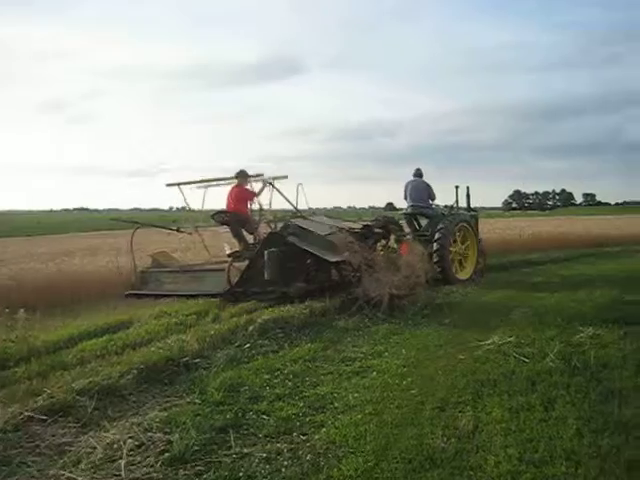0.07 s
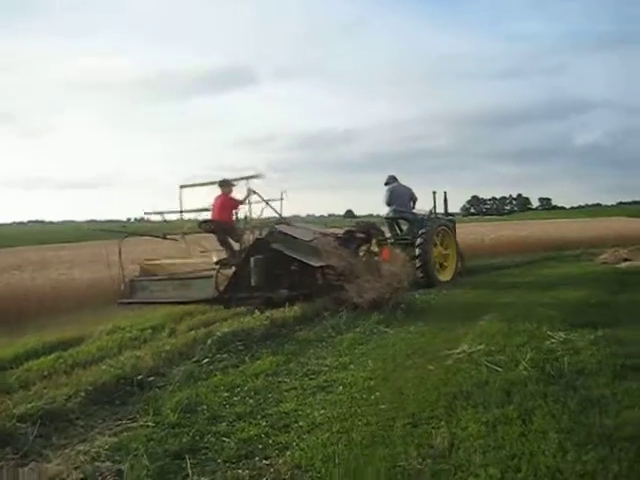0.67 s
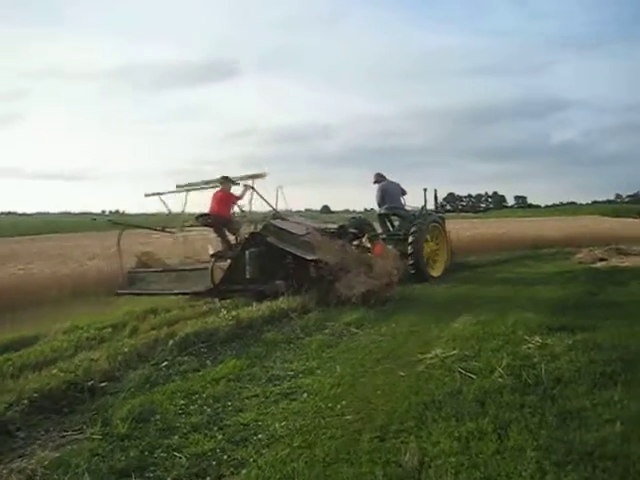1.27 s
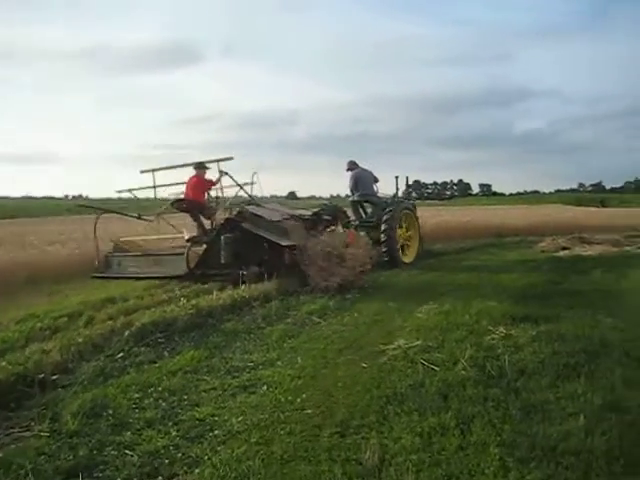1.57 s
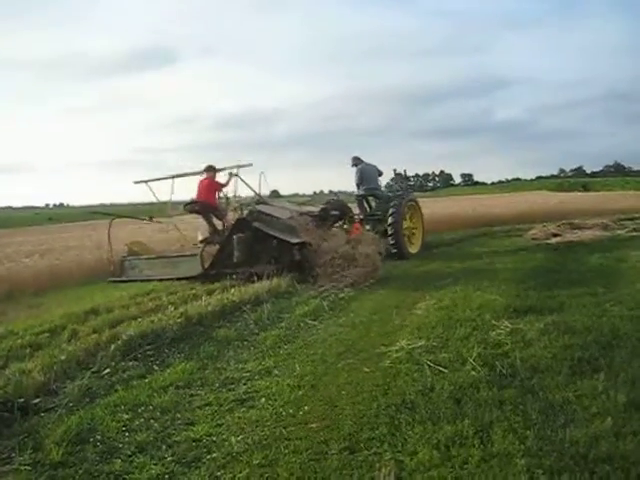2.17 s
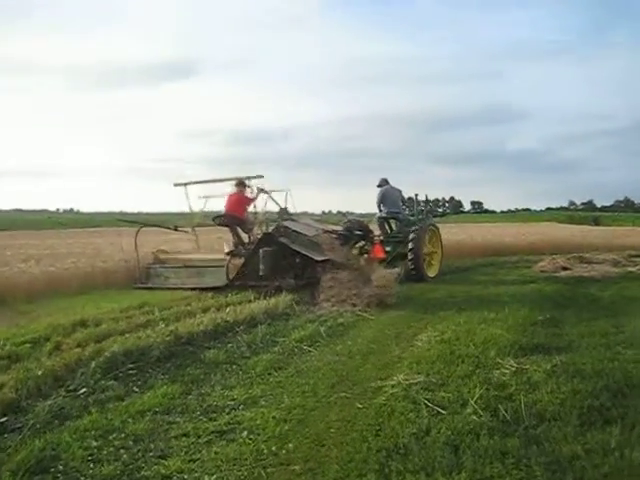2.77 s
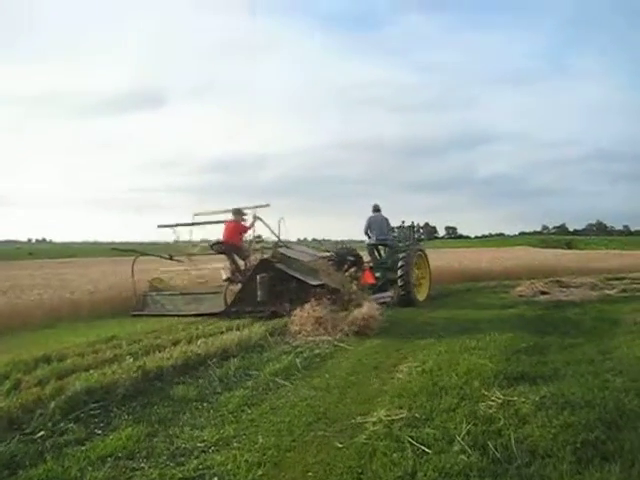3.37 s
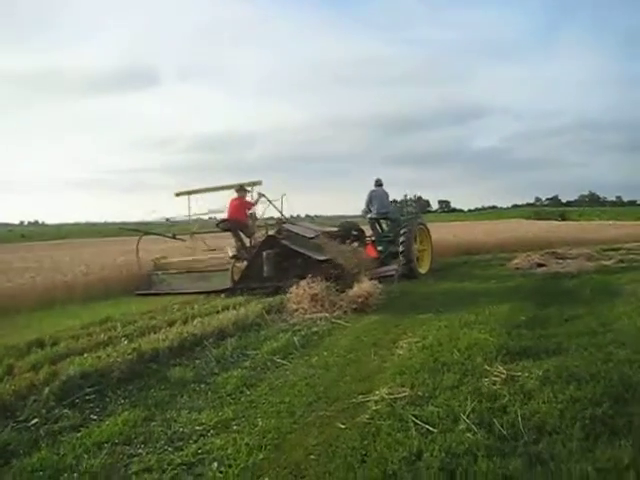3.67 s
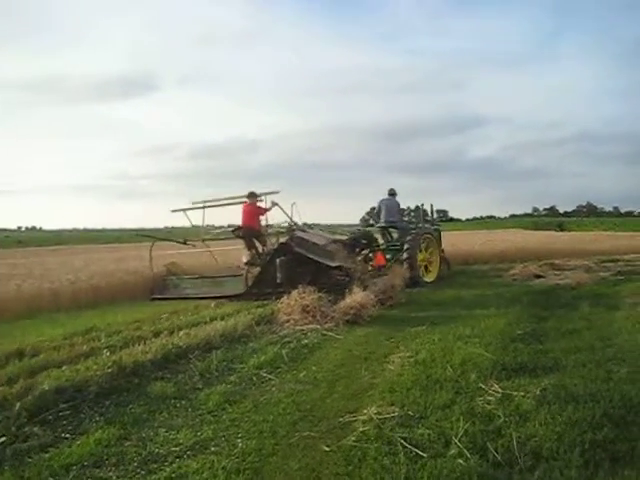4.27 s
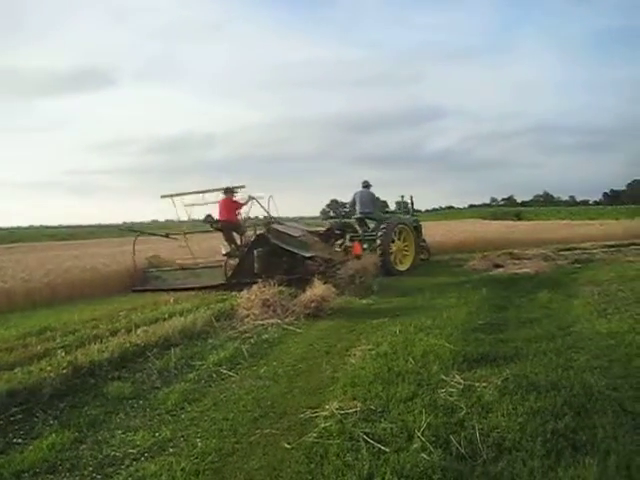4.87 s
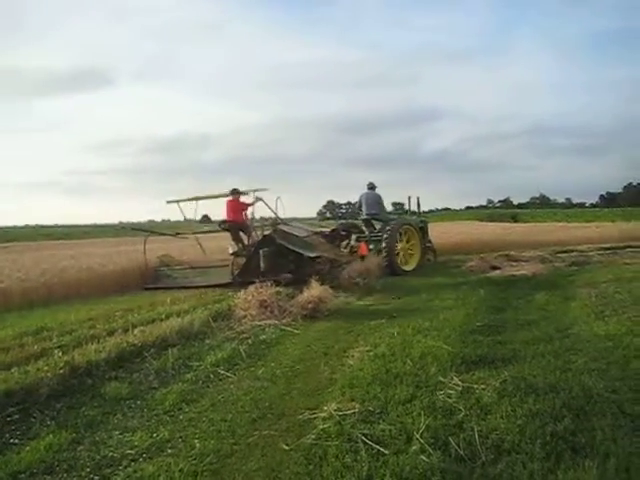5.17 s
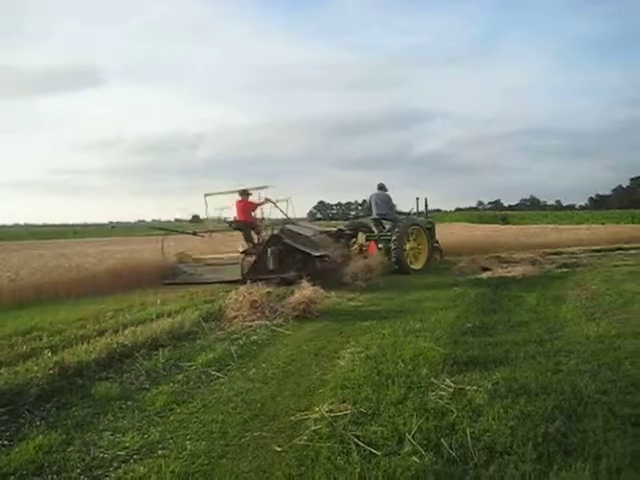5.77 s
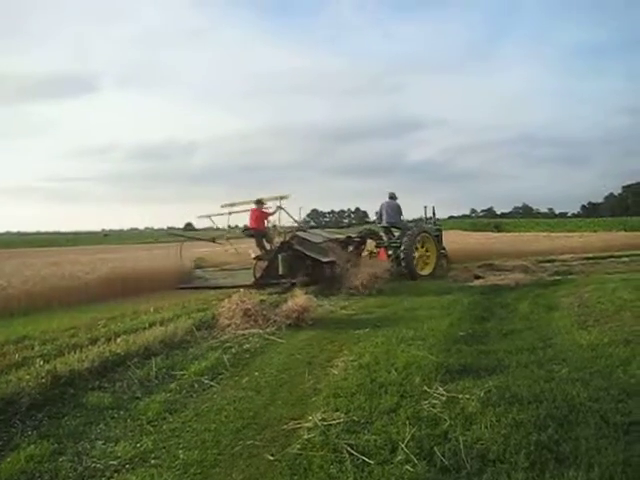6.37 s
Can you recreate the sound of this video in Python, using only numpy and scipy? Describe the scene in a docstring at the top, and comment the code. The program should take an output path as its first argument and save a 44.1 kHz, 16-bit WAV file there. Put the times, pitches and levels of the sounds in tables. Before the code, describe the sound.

Fast chain clatter, sickle knocks and rustling straw from a towed harvesting machine, over an old tractor's soft chug.

```python
"""A bright, fast rattle and a dry rustle: a grain binder in a wheat field, some metres away in the open.
Its drive chain clatters over a twelve-tooth sprocket, the sickle knocks at both ends of its stroke,
loose iron clanks and straw goes through in wads. Underneath chugs the quieter two-cylinder tractor
that pulls it, two uneven exhaust puffs a cycle. Towards the end the binder lurches with each crank turn."""
import sys
import numpy as np
from scipy import signal
from scipy.fft import rfft, irfft, next_fast_len
from scipy.io import wavfile

SR = 44100
rng = np.random.default_rng(int(sys.argv[2]) if len(sys.argv) > 2 else 0)


def generate_wav(sig):
    """Save sig (samples, or channels by samples) to the path in sys.argv[1] as 16-bit PCM at SR."""
    pcm = np.round(np.clip(np.atleast_2d(sig).T, -1, 1) * 32767).astype(np.int16)
    wavfile.write(sys.argv[1], SR, pcm)


N = 283122
T = np.arange(N) / SR


def from_db(db):
    """Decibels to gain."""
    return 10 ** (np.asarray(db) / 20)


def unit_rms(x):
    """Scale to unit power."""
    return x / np.sqrt(np.mean(x ** 2) + 1e-20)


def automation(rows):
    """One curve for each column after the time, read at every sample."""
    times, *columns = np.transpose(rows)
    return [np.interp(T, times, column) for column in columns]


def scatter(count):
    """Random variation with a spread of about 1 and no wild outliers."""
    return np.clip(rng.standard_normal(count), -1.7, 1.5)


def shaft_times(speed, phase, marks=1):
    """Times at which a shaft passes evenly spaced marks, the first at `phase` of a turn."""
    turns = np.cumsum(automation(speed)[0]) / SR
    return np.interp(np.arange(phase, turns[-1], 1 / marks), turns, T)


def clicks(times, sizes):
    """One-sample hits at the given times."""
    return np.bincount(np.clip(np.round(times * SR).astype(int), 0, N - 1), sizes, N)


def decay(x, seconds):
    """Give each hit an exponential tail."""
    return signal.lfilter([1], [1, -np.exp(-1 / (seconds * SR))], x + 1e-18)


def ring(x, hz, t60):
    """Resonator: a unit hit starts a dying cosine of height 1."""
    r, w = from_db(-60 / (t60 * SR)), 2 * np.pi * hz / SR
    return signal.lfilter([1, -r * np.cos(w)], [1, -2 * r * np.cos(w), r * r], x + 1e-18)


def grains(per_s, spread_db):
    """A crackle of tiny random contacts of uneven size; rms 1."""
    sizes = rng.standard_normal(N) * from_db(spread_db * np.minimum(rng.exponential(1, N), 4))
    return unit_rms(sizes * (rng.random(N) < per_s / SR))


def body(x, eq):
    """Colour a sound with a minimum-phase body that has this EQ curve; rms 1."""
    size = 2 * next_fast_len(N // 2 + 4096)
    hz, db = np.transpose(eq)
    bin_hz = np.arange(size // 2 + 1) * SR / size
    gain = from_db(np.interp(np.log(bin_hz + 1), np.log(hz), db))
    cepstrum = irfft(np.log(gain))[:size // 2]
    # folding the cepstrum onto positive times keeps all ringing after the hit
    response = np.exp(rfft(2 * cepstrum, size))
    return unit_rms(irfft(rfft(x, size) * response)[:N])


# engine tempo: (time [s], speed [cycles/s])
ENGINE_SPEED = [(0.0, 10.187), (0.71, 10.227), (1.43, 10.179), (2.14, 10.262), (2.85, 10.18), (3.57, 10.24),
                (4.28, 10.178), (4.99, 10.197), (5.71, 10.125), (6.42, 10.239)]
# pressure pulses of one cycle, firing first, intake last: (phase [cycles], signed strength [ratio])
ENGINE_STROKES = [(.531, 1), (.768, .3), (.021, -.33)]
def engine_pulses():
    """The strokes repeat every cycle, nearly alike in strength."""
    pulses = 0
    for phase, strength in ENGINE_STROKES:
        times = shaft_times(ENGINE_SPEED, phase)
        pulses = pulses + clicks(times, strength * from_db(.5 * scatter(len(times))))
    return pulses


# slapback off the machinery as the angle changes: (time [s], level against the direct puff [dB])
EXHAUST_ECHO = [(0, -11), (1.2, -25), (1.8, -14), (2.8, -3), (3.8, -1), (4.3, -15), (6.42, -17)]
# pipe overtones: (frequency [Hz], level before muffling [dB], t60 [s])
PIPE_MODES = [(72.3, -18, 0.37), (83, -18, 0.22), (121, -13, 0.35), (154.6, -20.5, 0.75),
              (175, -24.5, 0.79), (214.5, -24, 0.36)]
# low boom of the pipe: (time [s], level [dB])
PIPE_BOOM = [(0.0, -41), (0.27, -47.7), (2.1, -48.5), (3.3, -52.5), (4.2, -55), (4.63, -50), (6.42, -58)]
def exhaust(pulses, puff_db, puff_s=0.0018, boom_hz=52.0, echo_s=0.017, skew=0.38):
    """Each stroke is one rounded puff with an echo, and the pipe rings on between the puffs."""
    u = np.arange(-600, 601) / SR / puff_s   # time in puff widths
    puff_shape = (u * u - 1 - skew * u) * np.exp(-u * u / 2)
    puffs = np.convolve(pulses, puff_shape, "same")
    echo = from_db(automation(EXHAUST_ECHO)[0]) * np.interp(T - echo_s, T, puffs)
    muffle = signal.butter(2, 600, fs=SR, output="sos")
    modes = sum(from_db(db) * ring(pulses, hz, t60) for hz, db, t60 in PIPE_MODES)
    overtones = -signal.sosfilt(muffle, modes)
    boom = -signal.sosfilt(muffle, ring(pulses, boom_hz, t60=0.99))
    boom_db = automation(PIPE_BOOM)[0]
    return from_db(puff_db) * unit_rms(puffs + echo + overtones) + from_db(boom_db) * unit_rms(boom)


# midrange bite of the exhaust: (frequency [Hz], gain [dB])
RASP_EQ = [(300, -24), (1100, 1), (3500, 1.5), (9000, -18.5)]
def exhaust_rasp(pulses, decay_s=0.02):
    """Gas rasps out of the stack after each outward stroke."""
    return body(decay(np.maximum(pulses, 0), decay_s) * rng.standard_normal(N), RASP_EQ)


# dark roar of the block: (frequency [Hz], gain [dB])
BLOCK_EQ = [(25, -42), (60, -11), (110, -5.5), (180, -2), (285, -5), (325, -1), (360, -2.5), (490, -1),
            (512, 5.5), (560, 1), (675, -0.5), (715, -14.5), (900, 0), (2000, -11), (8000, -34)]
def engine_block(pulses, surge=0.11):
    """Gears and valves roar in the iron block, swelling at each firing."""
    return body(rng.standard_normal(N) * (1 + surge * decay(pulses, seconds=0.018)), BLOCK_EQ)


# tractor faders: (time [s], puff level [dB], block level [dB])
TRACTOR_LEVELS = [(0.0, -43.5, -39.5), (1.25, -46, -39.5), (1.6, -47, -43), (1.85, -43.5, -39.5),
                  (3.3, -43.5, -39), (3.7, -46, -39), (4.15, -42, -37), (4.6, -45.6, -38.5),
                  (5.4, -45.5, -39), (6.42, -43, -40)]
def tractor(rasp_over_puffs_db=6.5):
    """The background chug: the same pulses drive puffs, rasp and block."""
    puff_db, block_db = automation(TRACTOR_LEVELS)
    pulses = engine_pulses()
    rasp = from_db(puff_db + rasp_over_puffs_db) * exhaust_rasp(pulses)
    return exhaust(pulses, puff_db) + rasp + from_db(block_db) * engine_block(pulses)


# light accents from small iron parts: (time [s], level [dB], pitch [Hz])
CLINK_CUES = [(.328, -20, 4600), (0.534, -21, 1350), (0.941, -21, 2960), (1.856, -24, 3229),
              (2.626, -19, 3610), (3.222, -20, 1940), (3.297, -24, 1990), (3.39, -22, 2010),
              (3.684, -21, 4694), (3.985, -21, 1205), (4.375, -20, 1520), (5.14, -22, 1980),
              (5.238, -25, 2800), (5.752, -21, 2660), (5.852, -21, 2750), (6.166, -24, 1660)]
def clinks(ring_t60=0.047):
    """A single tap sets a small part ringing at one pitch."""
    return sum(ring(clicks(np.array([s]), [from_db(db)]), hz, ring_t60) for s, db, hz in CLINK_CUES)


def frame_rattle(per_s=5, ring_t60=0.057, spread_db=2.5, parts=48):
    """Rods, guards and sheet panels are jolted at random, each ringing at its own pitch."""
    rattle = 0
    for hz in np.geomspace(1000, 4900, parts) * from_db(0.11 * rng.standard_normal(parts)):
        times = np.cumsum(rng.exponential(1 / per_s, size=120))
        force = from_db(spread_db * scatter(len(times))) * (times < T[-1])
        rattle = rattle + ring(clicks(times, force), hz, ring_t60) * np.sqrt(hz)
    return unit_rms(signal.sosfilt(signal.butter(2, 800, "high", fs=SR, output="sos"), rattle))


# binder crank, the tempo of lurch, sickle and chain: (time [s], speed [turns/s])
CRANK_SPEED = [(0.0, 9.765), (0.71, 9.754), (1.43, 9.797), (2.14, 9.769), (2.85, 9.807), (3.57, 9.739),
               (4.28, 9.79), (4.99, 9.709), (5.71, 9.716), (6.42, 9.817)]
# tremolo depth of the lurch: (time [s], swing [dB])
LURCH_DEPTH = [(0.0, 0), (1.2, 0), (2.0, -0.05), (5.55, 0), (5.78, 1.5), (5.95, 1.5), (6.15, 0.5),
               (6.42, 1)]
def lurch(peak_phase=0.13):
    """The binder lurches once per crank turn: a level swing in dB."""
    turns = np.cumsum(automation(CRANK_SPEED)[0]) / SR
    return automation(LURCH_DEPTH)[0] * np.cos(2 * np.pi * (turns - peak_phase))


# the two knocks of a crank turn: (phase [turns], relative level [dB], decay [s])
SICKLE_KNOCKS = [(0.188, 4, 0.008), (0.707, 1.5, 0.016)]
# iron-on-iron tone of the sickle, shared by the clanks: (frequency [Hz], gain [dB])
IRON_EQ = [(300, -14.5), (750, -12), (1150, -3), (1600, -6.5), (1930, 3.5), (2150, -5.5), (2900, -0.5),
           (3700, 0.5), (5000, -4), (7000, -5.5), (12000, -10), (15700, -23)]
def sickle(jitter_s=0.0012, spread_db=2.0):
    """The knife bar knocks at each reversal and its sections rattle in the guards."""
    envelope = 0
    for phase, db, decay_s in SICKLE_KNOCKS:
        times = shaft_times(CRANK_SPEED, phase)
        force = from_db(db + spread_db * scatter(100)[:len(times)])
        times = times + jitter_s * scatter(100)[:len(times)]
        envelope = envelope + decay(clicks(times, force), decay_s)
    envelope = decay(envelope, seconds=0.00092)   # softens the attack
    return body(envelope * grains(per_s=10000, spread_db=1.5), IRON_EQ)


# loose iron, mostly thrown as the knife reverses: (time [s], nominal peak level [dB], pitch [Hz])
CLANK_CUES = [(0.0747, -14, 3540), (0.1226, -15, 3440), (0.6325, -15.5, 2800), (0.7372, -13.5, 3740),
              (0.8385, -17, 3070), (1.0453, -11.5, 3180), (1.862, -13, 3250), (2.4696, -18, 4200),
              (2.8826, -15, 3650), (3.403, -13.5, 3800), (4.1121, -15, 3800), (4.6794, -16, 3310),
              (4.932, -17, 3590), (5.244, -15, 3810), (5.3414, -19, 4220), (5.4455, -15, 3850),
              (5.7309, -17, 3800), (6.0648, -11.5, 3610), (6.268, -15, 3170), (6.326, -20, 3640)]
def clanks(chatter_s=0.0036, ring_t60=0.017, ring_db=-4.0, crest_db=7):
    """A loose part chatters for an instant and rings briefly at its own pitch."""
    track, age = np.zeros(N + SR), T[:SR // 10]
    contact = body(rng.standard_normal(N), IRON_EQ)
    for s, db, hz in CLANK_CUES:
        start = round(s * SR)
        span = slice(start, start + len(age))
        hit = np.resize(contact[span], len(age)) * np.exp(-age / chatter_s)
        clank = unit_rms(hit) + from_db(ring_db) * unit_rms(ring(hit, hz, ring_t60))
        attack_rms = clank[:SR // 200].std()   # first 5 ms
        track[span] += from_db(db - crest_db) * clank / attack_rms
    return track[:N]


# dry, papery rustle: (frequency [Hz], gain [dB])
STRAW_EQ = [(250, -25), (740, -10.5), (1000, -5), (1350, -1.5), (1700, -3), (1930, -1), (2170, -1.5),
            (3500, 1), (5600, -6.5), (7000, -2), (9500, -5.5), (12000, -7.5), (13200, -11), (15700, -21)]
def straw():
    """Dry stalks snap and slide over the canvases and through the packers."""
    return body(grains(per_s=16000, spread_db=2.5), STRAW_EQ)


# how thick the crop comes in: (time [s], base level [dB])
CROP_LEVEL = [(0.0, -27), (0.6, -28), (0.85, -27.5), (1.15, -28), (1.35, -28), (1.65, -27), (1.88, -26),
              (2.45, -27.5), (3.45, -26.5), (3.55, -30), (3.63, -26.5), (4.3, -26.5), (4.55, -27),
              (5.15, -26), (5.6, -26.5), (6.15, -27), (6.42, -28.5)]
# thick wads going through the packers: (time [s], swell [dB], half length [s])
STRAW_WADS = [(.75, 2.5, 0.057), (1.36, 3.5, 0.016), (1.533, 4, 0.019), (3.38, 0, 0.021),
              (3.825, 2.5, 0.03), (4.375, 3.5, .022), (4.848, 2.2, 0.028), (5.77, 1.5, .012),
              (6.162, 2.5, 0.029)]
def cutting(lurch_db, sickle_db=-5, frame_db=-9):
    """Straw, sickle and frame rise and fall with the crop; each wad is a short rounded swell."""
    wad_db = sum(db * np.exp(-.5 * ((T - s) / half_s) ** 2) for s, db, half_s in STRAW_WADS)
    layers = straw() + from_db(sickle_db) * sickle() + from_db(frame_db) * frame_rattle()
    return from_db(automation(CROP_LEVEL)[0] + wad_db + lurch_db) * layers


def loose_links(per_s=16, ring_t60=0.023, spread_db=4.5, links=20):
    """Slack links tick against each other at random, each short and bright."""
    ticks = 0
    for hz in np.geomspace(4200, 12000, links):
        times = np.cumsum(rng.exponential(1 / per_s, size=300))
        force = from_db(spread_db * scatter(len(times))) * (times < T[-1])
        ticks = ticks + ring(clicks(times, force), hz, ring_t60)
    return unit_rms(signal.sosfilt(signal.butter(2, 3000, "high", fs=SR, output="sos"), ticks))


# how hard each sprocket tooth takes its link: (accent [dB])
TOOTH_ACCENTS = [-0.83, 1.9, 0.21, -1.3, -1.7, 1.3, -2, 1, -1.1, -0.46, -0.53, 1.5]
# bright slap of the links: (frequency [Hz], gain [dB])
LINK_EQ = [(400, -30.5), (1000, -11.5), (2000, -11.5), (3300, -10), (4600, -1.5), (5600, -7.5),
           (7000, -5.5), (8300, -2), (9500, -3), (11000, -1), (12200, -5), (13100, -7), (15700, -22)]
# high ring of the rollers: (frequency [Hz], gain [dB])
ROLLER_EQ = [(400, -45), (5000, -24), (6250, -6), (6830, 4.5), (7350, -1.5), (8300, -12), (9500, -30),
             (11000, -8), (12200, -7), (13100, -26), (15700, -40)]
def chain(uneven_db=3.0, own_db=1.5, jitter_s=.001, seat_s=0.0028, roller_db=-3, limp_s=.0007):
    """Every link slaps onto its tooth and chatters as it seats; its roller rings with its own force."""
    times = shaft_times(CRANK_SPEED, phase=.072, marks=12)
    force_db = np.resize(TOOTH_ACCENTS, len(times)) + uneven_db * scatter(len(times))
    limp = np.resize([limp_s, -limp_s], len(times))   # inner and outer links seat late and early in turn
    times = times + limp + jitter_s * rng.standard_normal(len(times))
    rattle = 0
    for eq, db in ((LINK_EQ, 0), (ROLLER_EQ, roller_db)):
        force = from_db(force_db + own_db * scatter(len(times)))
        envelope = decay(clicks(times, force), seat_s) + 0.069   # steady floor of slack chatter
        rattle = rattle + from_db(db) * body(envelope * rng.standard_normal(N), eq)
    return unit_rms(rattle)


# pull on the chain, heard as the strength of its rattle: (time [s], base level [dB])
CHAIN_LEVEL = [(0.0, -26), (0.55, -24.5), (0.95, -26.5), (1.25, -25), (1.65, -27), (2.2, -25), (2.5, -25.5),
               (3.5, -25.5), (4.3, -26.5), (4.7, -25.5), (6.42, -26)]
def chain_drive(lurch_db, ticks_db=-8):
    """The lead layer: sprocket rattle and link ticks grow louder as the chain pulls harder."""
    layers = unit_rms(chain() + from_db(ticks_db) * loose_links())
    return from_db(automation(CHAIN_LEVEL)[0] + lurch_db) * layers


def scene():
    """Tractor and binder together in the open field, in mono."""
    lurch_db = lurch()
    return (tractor() + cutting(lurch_db) + chain_drive(lurch_db) + clanks() + clinks())[None]


def record(dry, low_cut_hz=18, high_cut_hz=15800):
    """One microphone, deaf to the deepest bass; the top is cut steeply."""
    thinned = signal.sosfilt(signal.butter(1, low_cut_hz, "high", fs=SR, output="sos"), dry)
    return signal.sosfilt(signal.ellip(12, .2, 95, high_cut_hz, fs=SR, output="sos"), thinned)


dry = scene()
out = record(dry)
generate_wav(out)
```